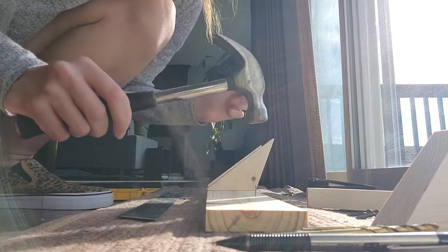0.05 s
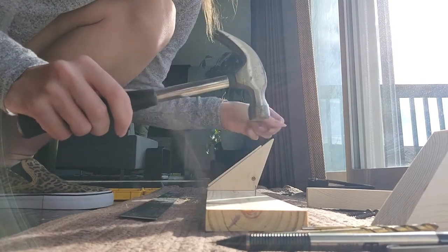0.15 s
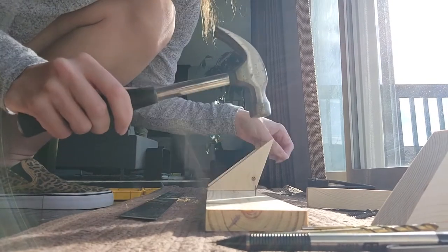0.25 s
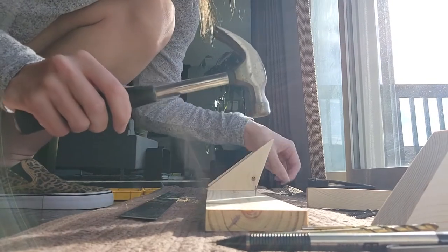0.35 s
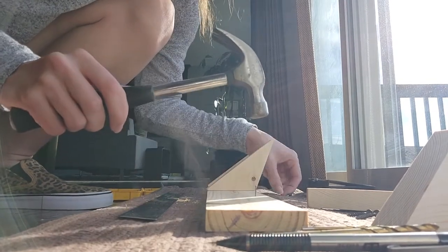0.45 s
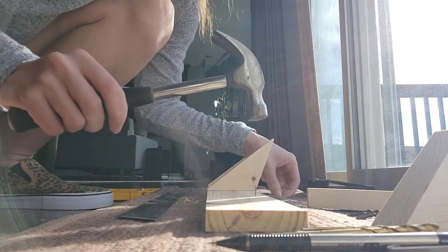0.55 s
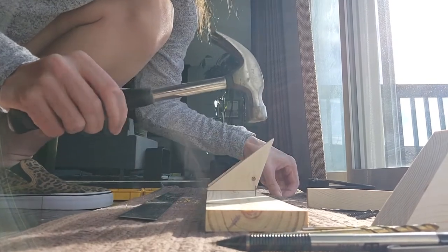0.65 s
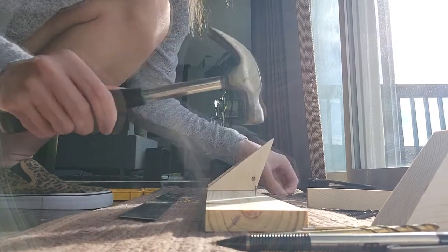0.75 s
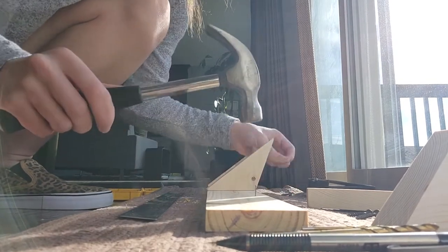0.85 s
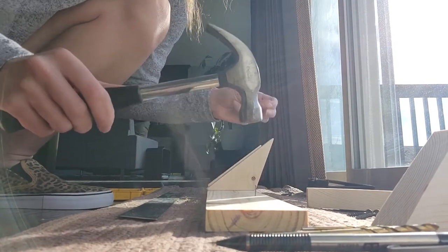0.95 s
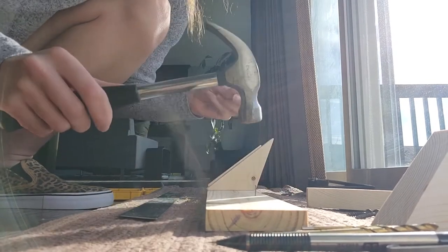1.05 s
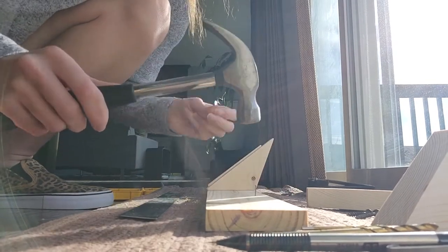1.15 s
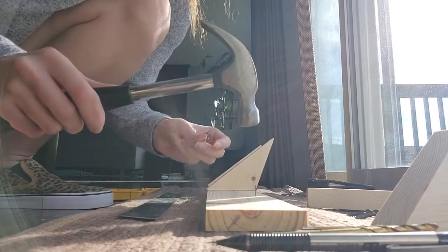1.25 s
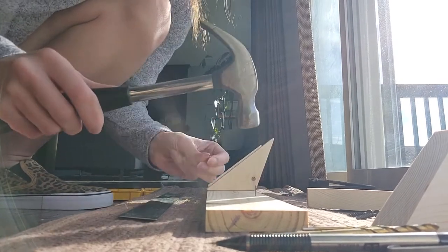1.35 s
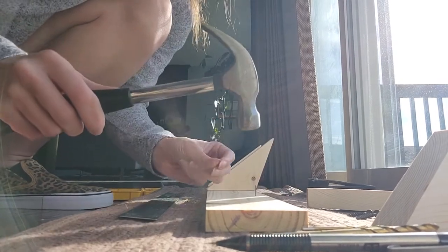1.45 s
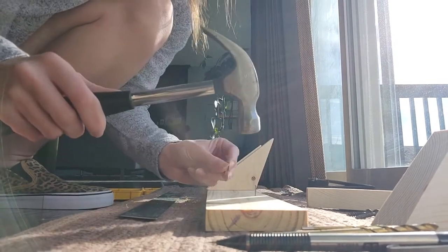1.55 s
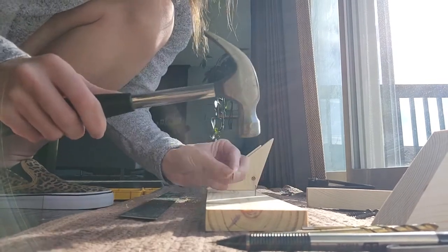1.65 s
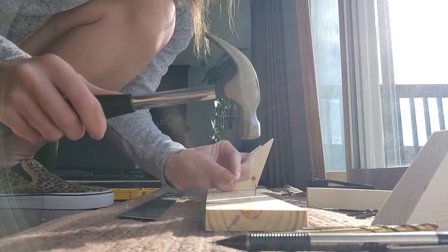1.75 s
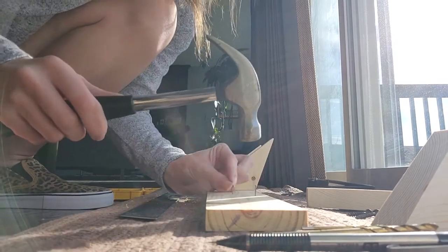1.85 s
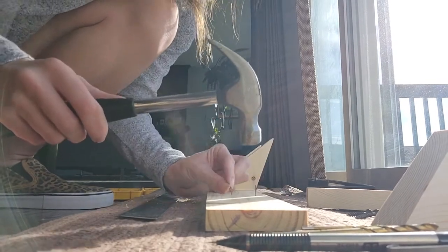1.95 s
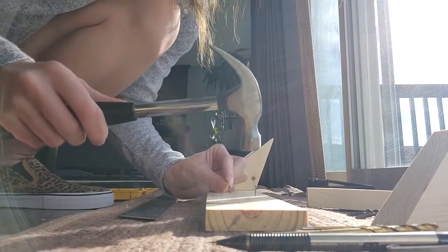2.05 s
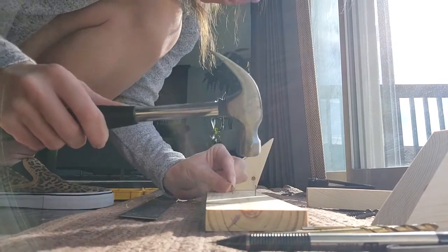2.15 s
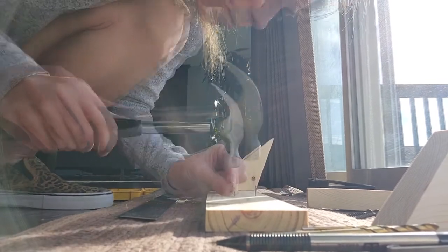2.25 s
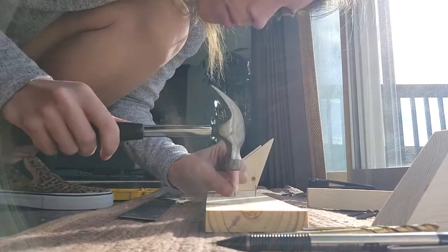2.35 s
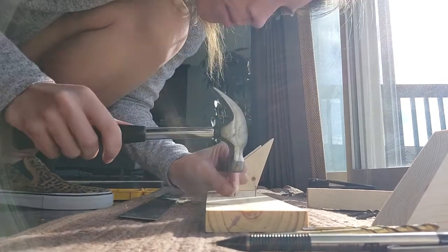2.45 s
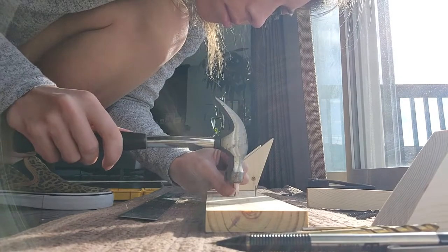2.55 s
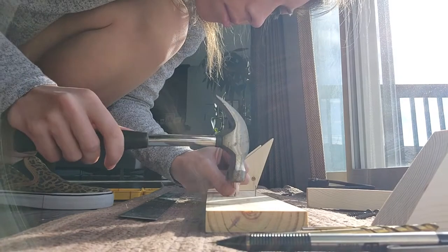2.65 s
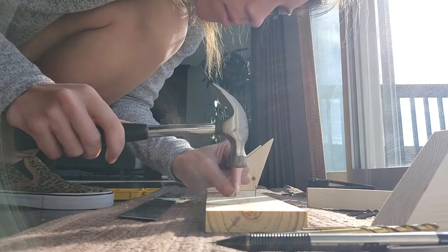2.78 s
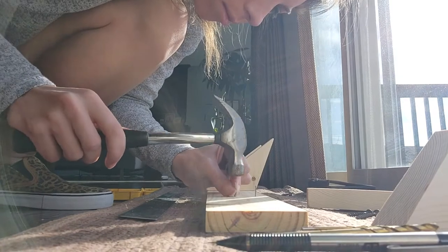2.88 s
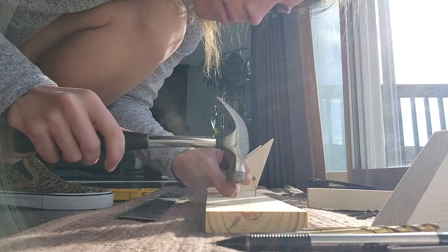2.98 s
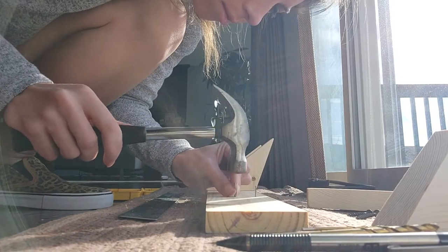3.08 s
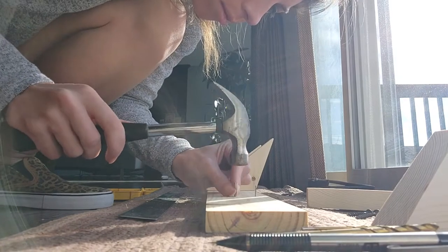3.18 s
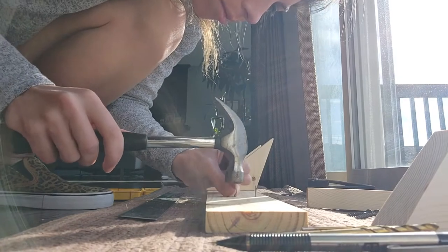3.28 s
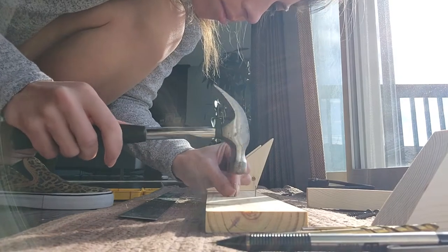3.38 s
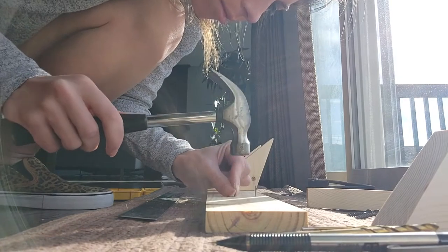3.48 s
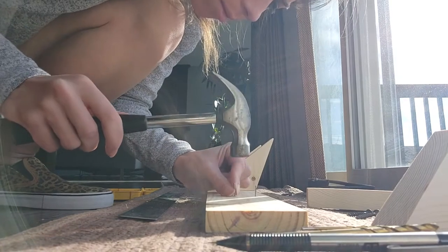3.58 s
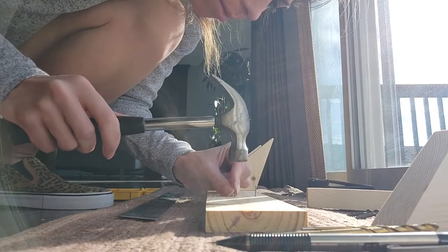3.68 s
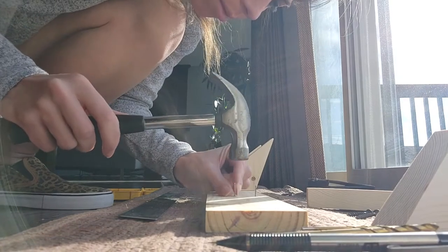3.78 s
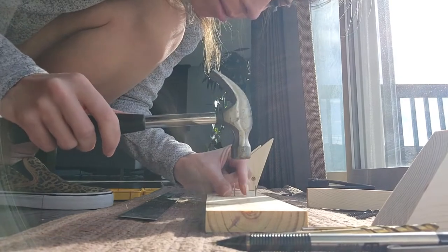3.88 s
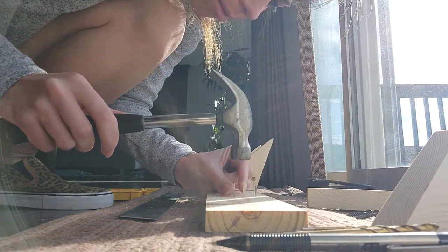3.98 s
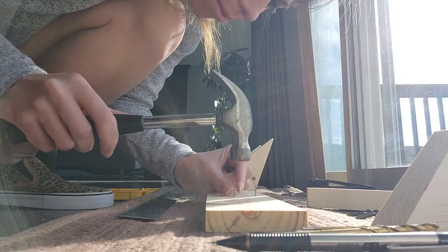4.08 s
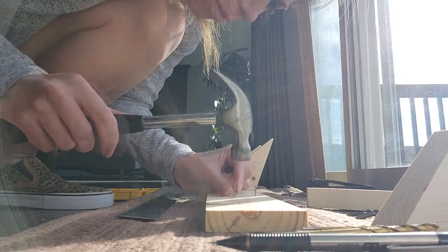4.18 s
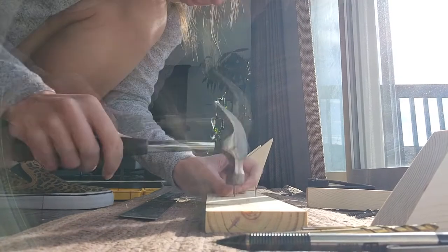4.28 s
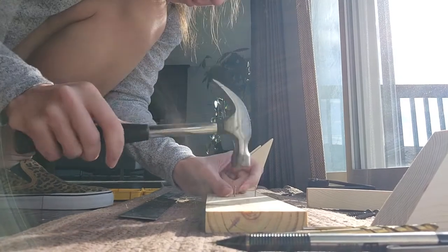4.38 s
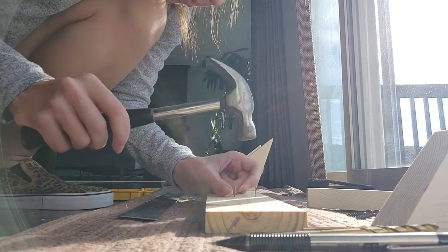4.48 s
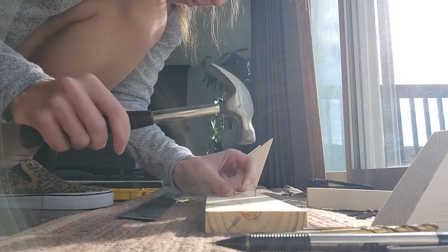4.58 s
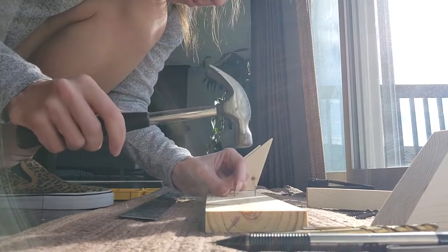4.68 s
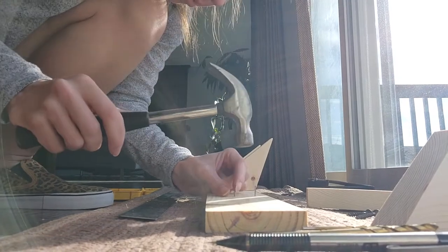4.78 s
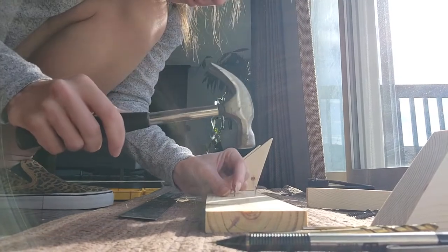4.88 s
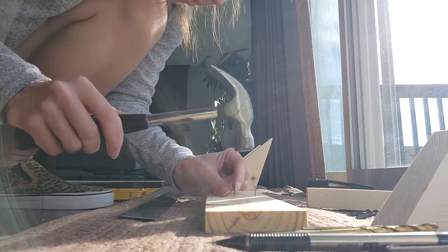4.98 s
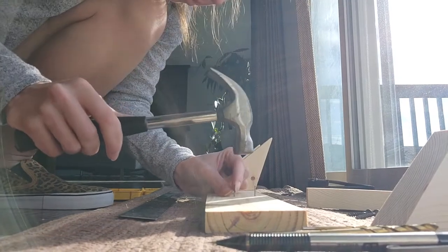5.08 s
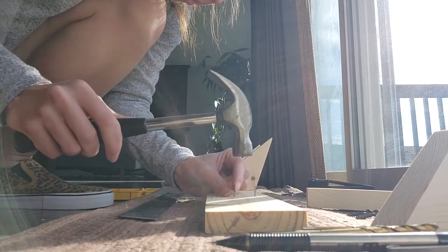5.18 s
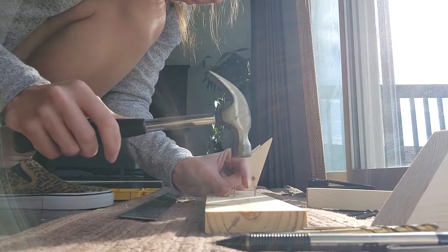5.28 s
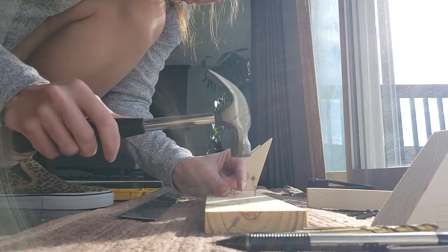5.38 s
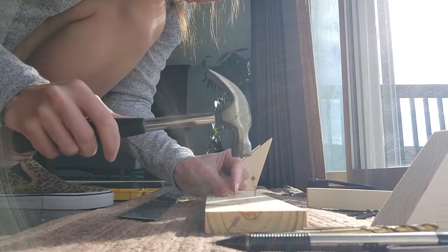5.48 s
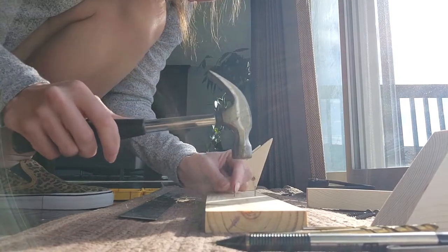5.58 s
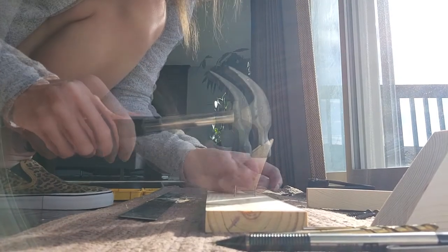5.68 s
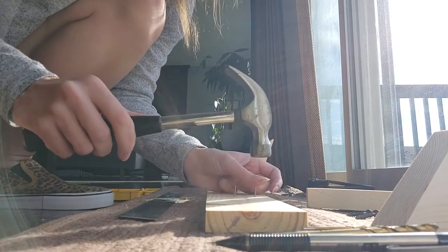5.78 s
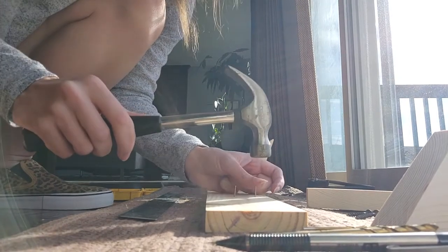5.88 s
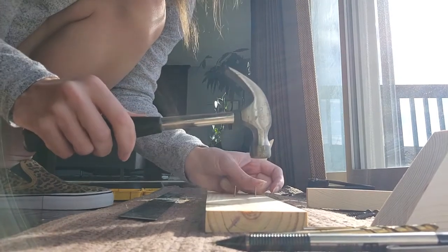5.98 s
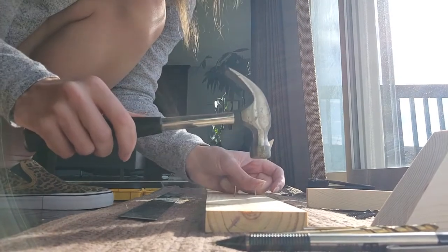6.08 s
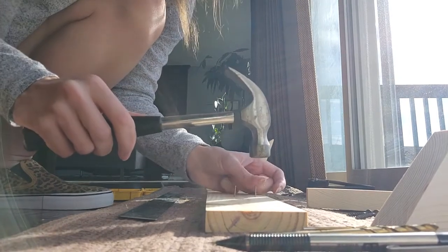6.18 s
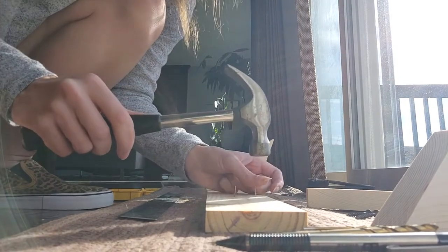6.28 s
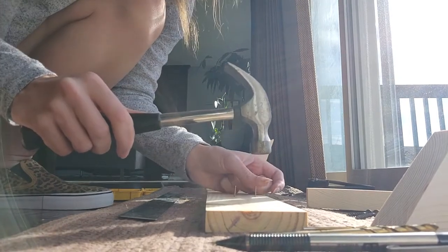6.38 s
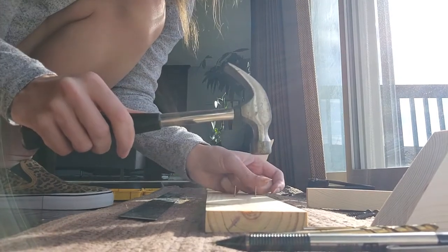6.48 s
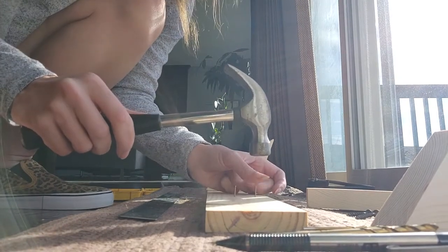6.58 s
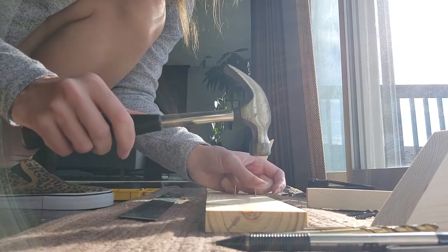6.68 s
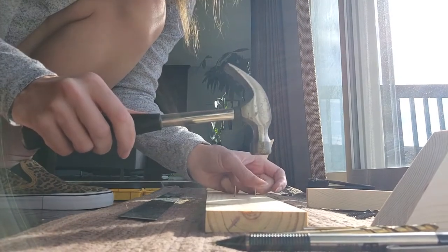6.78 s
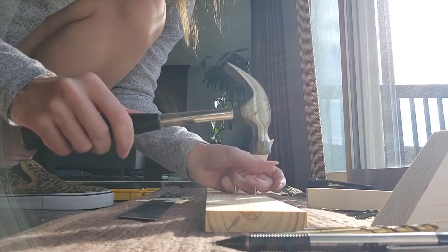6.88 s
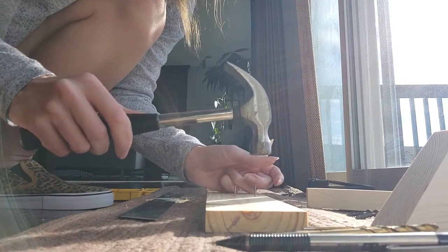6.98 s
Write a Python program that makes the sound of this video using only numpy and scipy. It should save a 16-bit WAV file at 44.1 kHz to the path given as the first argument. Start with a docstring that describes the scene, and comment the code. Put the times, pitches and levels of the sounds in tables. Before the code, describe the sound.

A low pulsing motor hum and dripping water indoors, with three dull hammer knocks and then a harder, brighter one on wood.

```python
"""Hammer taps beside a water pump

A claw hammer taps a brad into a pine block on a carpeted floor, a hand's length from a two-port microphone.
The block knocks, the floor thuds, the steel head rings and the block hops: each is a set of fading tones.
Across the room a pump hums against a second motor (steady tones), and its outflow drips (ringing bubbles).
Air rush and short bursts of high hiss are shaped noise. Five stretches are spliced, the middle ones quieter."""
import sys
import numpy as np
from scipy import signal
from scipy.fft import rfft, irfft
from scipy.io import wavfile

SR = 44100
rng = np.random.default_rng(int(sys.argv[2]) if len(sys.argv) > 2 else 0)


def pcm_store(signal):
    """Save signal as 16-bit PCM."""
    levels = np.round(np.clip(np.atleast_2d(signal), -1, 1) * 32767)
    wavfile.write(sys.argv[1], SR, levels.astype(np.int16).T)


N = 310464
T = np.arange(N) / SR
LEFT_RIGHT = np.array([[1], [-1]])  # shares a level difference between the two ports


def undb(db):
    """Turn decibels into a plain loudness factor."""
    return 10 ** (np.asarray(db) / 20)


def read(table, hz, column=1):
    """Read a table column at these frequencies, in straight lines on a log frequency axis."""
    table = np.array(table, float)
    return np.interp(np.log(np.maximum(hz, 1)), np.log(table[:, 0]), table[:, column])


def add(out, at_s, sound):
    """Mix a short sound in at a time."""
    i = int(at_s * SR)
    out[i:i + len(sound)] += sound[:N - i]


# how alike the noise is at the two ports: f/Hz, likeness (0 to 1)
PORT_ALIKENESS = [(60, 1), (200, 0.83), (500, 0.65), (1300, 0.09), (5000, 0), (8000, 0.93), (15000, 0.47)]
# how far the left port is louder than the right in noise and echoes: f/Hz, level difference/dB
NOISE_BALANCE = [(60, 1.0), (110, 0.5), (200, 2.0), (380, 3.5), (700, 2.5), (1290, -0.5), (2380, 1.0),
                 (4400, 3.5), (8120, 3.5), (15000, 1.0)]


def diffuse(size):
    """Noise from all around, as spectra at the two ports: alike in the bass, unrelated in the middle."""
    hz = np.arange(size // 2 + 1) * SR / size
    alike = np.clip(read(PORT_ALIKENESS, hz), 0, 1)
    mid, side = rfft(rng.standard_normal((2, size)))
    pair = np.sqrt((1 + alike) / 2) * mid + LEFT_RIGHT * np.sqrt((1 - alike) / 2) * side
    return hz, pair * undb(LEFT_RIGHT * read(NOISE_BALANCE, hz) / 2)


PUMP_HZ = 60.105


def casing_buzz(turns):
    """The pump casing buzzes once a turn: noise around 1280 Hz jumps up, then sinks until the next turn."""
    hz, pair = diffuse(N)
    casing = irfft(pair / (1 + ((hz - 1280) / 90) ** 2), N)
    return undb(-62) * np.exp(-(turns % 1) / 1.05) * casing / np.std(casing)


# the spliced stretches: start t/s, level/dB, drone crest t/s, throb peak t/s, throb f/Hz
SPLICED_STRETCHES = [(0, 0, .5421, .296, 6.69), (.7139, 0, .9578, 1.019, 6.69),
                     (2.245, -9, 2.4533, 2.441, 6.68), (4.2422, -10.5, 5.4293, 5.18, 6.64),
                     (5.6736, 0, 5.8938, 5.981, 6.6)]
STRETCH_NUMBER = np.searchsorted(np.array(SPLICED_STRETCHES)[:, 0], T, side="right") - 1  # at every sample
# hum at multiples of the mains pitch: multiple, level/dB (rms, before port balance and stretch level)
MAINS_LINES = [(2, -57), (3, -68), (4, -66), (6, -69.5), (7, -65.5), (8, -70.5), (12, -72)]
MAINS_HZ = 60.015
PUMP_DB, MOTOR_DB = -47.5, -52.5  # rms, before port balance and stretch level


def hum(crest_s, throb_s, beat_hz):
    """The pump drones just above mains pitch and throbs as it beats with a second motor, over mains hum."""
    since_crest = T - crest_s
    turns = PUMP_HZ * since_crest
    lines = sum(undb(db) * np.cos(2 * np.pi * k * MAINS_HZ * since_crest + k) for k, db in MAINS_LINES)
    pump = undb(PUMP_DB) * np.cos(2 * np.pi * turns)
    motor = undb(MOTOR_DB) * np.cos(2 * np.pi * (turns + beat_hz * (T - throb_s)))
    tones = np.sqrt(2) * (lines + pump + motor)  # rms level to peak level
    return tones * undb(0.4 * LEFT_RIGHT) + casing_buzz(turns)


# room air and water rush: f/Hz, level/dB per Hz (before port balance and stretch level)
AIR_RUSH = [(30, -105), (90, -83.5), (165, -90.5), (300, -88), (410, -85.5), (620, -87), (940, -98),
            (1500, -100.5), (1830, -96), (2400, -108), (3500, -113), (6900, -117), (8700, -130),
            (12300, -124), (16000, -128)]


def air():
    """Steady rush of the room and the running water: noise coloured by the table."""
    hz, pair = diffuse(N)
    return irfft(pair * undb(read(AIR_RUSH, hz)) * np.sqrt(SR / 2), N)


# echoes in each pitch region: f/Hz, t60/s (time to fall 60 dB, before the hurry setting), level/dB
ROOM_ECHOES = [(71.5, 0.34, -4), (206, 0.4, -10.5), (499, 0.4, -10.5), (1340, 0.48, -16.5),
               (4000, 0.35, -3), (10060, 0.32, -11)]


def room(x, hurry=0.85, build_s=0.0012):
    """Echoes as octave bands of diffuse noise that build up, then die at their own rate.
    A larger hurry makes them die faster."""
    size = SR // 2
    t = np.arange(size) / SR
    hz, pair = diffuse(size)
    response = 0
    for centre in 1000 * 2. ** np.arange(-4, 5):
        octaves = np.log2(np.maximum(hz, 1) / centre)
        band_shape = np.cos(np.pi / 2 * np.clip(octaves, -1, 1)) ** 2
        band = irfft(pair * band_shape, size)
        decay = np.exp(-np.log(1000) * t * hurry / read(ROOM_ECHOES, centre))
        tail = decay * (1 - np.exp(-t / build_s))
        tail = tail / np.sqrt(np.sum(tail ** 2))
        response = response + undb(read(ROOM_ECHOES, centre, column=2)) * band * tail
    return signal.fftconvolve(x[None], response, axes=1)[:, :N]


# drips at set times, most of them loud:
# t/s, middle bubble f/Hz (before scatter and glide), level/dB (before the mix)
TIMED_DRIPS = [(0.045, 1970, -54.5), (0.05, 3410, -60), (0.04, 6940, -58.5), (0.31, 2070, -56),
               (0.44, 3780, -68), (0.562, 3080, -59.5), (0.656, 4640, -55.5), (0.668, 3020, -52),
               (0.735, 6040, -56), (0.793, 2850, -60), (0.865, 3080, -56.5), (0.893, 2520, -54.5),
               (0.9, 1150, -47.5), (1.235, 6680, -57), (1.266, 3560, -63.5), (1.35, 4600, -62.5),
               (1.37, 3110, -48.5), (1.508, 2770, -58.5), (1.574, 5500, -59.5), (1.758, 1680, -53),
               (1.835, 4130, -61.5), (1.893, 3080, -54), (1.899, 2265, -46), (2.0, 6000, -59),
               (2.098, 3360, -59), (2.148, 3070, -58.5), (2.205, 4590, -60.5), (2.362, 2460, -61),
               (2.476, 3100, -55), (2.521, 6800, -54.5), (2.533, 2180, -51), (2.579, 5250, -56),
               (3.235, 2920, -56), (3.254, 5000, -63), (3.53, 3140, -54), (3.62, 7250, -56),
               (3.656, 2660, -52.5), (3.668, 5000, -58.5), (3.884, 4280, -54.5), (3.93, 2540, -50.5),
               (4.119, 2490, -51.5), (4.775, 3570, -62), (4.817, 1520, -51), (5.046, 6300, -66),
               (5.255, 5750, -67), (5.445, 2850, -62), (5.575, 7150, -66), (5.826, 4995, -62),
               (5.848, 3850, -56), (5.888, 6900, -64), (5.92, 5500, -63.5), (6.097, 3090, -52),
               (6.161, 7200, -57), (6.168, 4660, -60.5), (6.28, 5100, -65), (6.35, 2497, -62.5),
               (6.387, 3330, -65), (6.502, 7260, -58), (6.624, 2980, -61), (6.73, 6000, -54.5),
               (6.955, 7000, -57)]
# gap between the bubbles of a -55 dB drop, as a share of the pitch before chance; louder drops spread wider
BUBBLE_SPREAD, SPREAD_PER_DB = .055, .003


def drips(cycles=12.8, glide=0.029, small_db=-75.0, count=200):
    """Each drop traps three bubbles of near sizes that ring a few cycles and rise in pitch; echoes dominate.
    A splice cuts off the echoes of the drops before it."""
    chance = rng.random((count, 3))
    small_s = chance[:, 0] * N / SR
    small_hz = 1800 * 4.3 ** chance[:, 1]
    small_level_db = small_db - 9 * chance[:, 1] + 12 * chance[:, 2] ** 2  # higher drips tend to be fainter
    out = np.zeros(N)
    t = np.arange(900) / SR
    for s, hz, db in np.r_[TIMED_DRIPS, np.c_[small_s, small_hz, small_level_db]]:
        spread = max(BUBBLE_SPREAD + SPREAD_PER_DB * (db + 55), .01) * rng.uniform(.6, 1.4)
        steps = np.array([[-1], [0], [1]]) + 0.24 * rng.standard_normal((3, 1))
        bubbles_hz = hz * (1 + spread * steps)
        age = t * bubbles_hz / cycles
        waves = np.sin(2 * np.pi * bubbles_hz * t * (1 + glide * age / 2))
        pings = waves * age * np.exp(-3 * age)
        add(out, s, undb(db) * np.sum(pings * undb([[-3], [0], [-3]]), axis=0))
    echoes = 0
    for k in np.unique(STRETCH_NUMBER):
        inside = STRETCH_NUMBER == k
        echoes = echoes + inside * room(out * inside, hurry=0.93, build_s=0.0043)
    return undb(10) * out + undb(26.5) * echoes


# hammer blows: t/s, floor thud level/dB, block knock level/dB, brad ring level/dB, steel level/dB,
# crack level/dB, top hiss level/dB, left minus right level/dB (levels before the mix)
HAMMER_BLOWS = [(2.6712, -10, -18, -31, -35, -46, -58, 1.5),
                (3.0319, -7.5, -8.5, -21.5, -32, -44.5, -52, 1.5), (3.366, -3, -8, -15, -26, -32, -57, 2),
                (4.3653, -1, 0.5, -16.5, -15, -19, -30.5, -1)]
RANDOM_HISS_DB, RANDOM_SCATTER_DB, SPLICE_TICK_DB = -86.5, 2.5, -78.5  # before stretch level
HISS_TAIL_DB, HISS_TAIL_S = -18, 0.043  # tail against the burst; time to fall to 37 %


def top_hiss(fade_s=0.0035, count=20):
    """Short bursts of the highest hiss with a faint tail, alike at both ports.
    There is one at each blow and splice, and others at random times."""
    chance = rng.random((count, 2))
    random_db = RANDOM_HISS_DB - RANDOM_SCATTER_DB * np.log(1 - chance[:, 1])
    at_random = np.c_[chance[:, 0] * N / SR, random_db]
    splices = [(row[0], SPLICE_TICK_DB) for row in SPLICED_STRETCHES[1:]]
    blows = np.array(HAMMER_BLOWS)[:, [0, 6]]
    age = np.arange(SR // 4) / SR
    burst = np.exp(-age / fade_s) + undb(HISS_TAIL_DB) * np.exp(-age / HISS_TAIL_S)
    loudness = np.zeros(N)
    for s, db in np.r_[at_random, splices, blows]:
        add(loudness, s, undb(db) * burst)
    top_only = signal.butter(3, 9500, "high", fs=SR, output="sos")
    return loudness * signal.sosfilt(top_only, rng.standard_normal(N))


# the block hops after a blow: t/s, floor thud level/dB, block knock level/dB (before the mix)
BLOCK_HOPS = [(2.702, -15.5, -24), (3.058, -32, -44), (3.09, -23, -31), (3.377, -18, -25),
              (3.3932, -12.5, -16), (3.404, -19, -20), (3.421, -25.5, -49), (4.378, -36, -8),
              (4.3985, -35, -3), (4.418, -16, -32), (4.437, -13, -35)]
# a hop shakes the metal less than its blow did, and less the later it comes
HOP_BRAD_DB, HOP_STEEL_DB, HOP_CRACK_DB, HOP_FADE_DB_PER_S = -13.5, -18, -14, 131


def knocks():
    """Blows and the hops they cause, as one list of rows (t/s, thud, knock, brad, steel, crack level/dB)."""
    blows, hops = np.array(HAMMER_BLOWS)[:, :6], np.array(BLOCK_HOPS)
    cause = blows[np.searchsorted(blows[:, 0], hops[:, 0]) - 1]  # the last blow before each hop
    fade_db = HOP_FADE_DB_PER_S * (hops[:, :1] - cause[:, :1])
    metal_db = cause[:, 3:] + [HOP_BRAD_DB, HOP_STEEL_DB, HOP_CRACK_DB] - fade_db
    return np.r_[blows, np.c_[hops, metal_db]]


def ring(modes, scatter_db, detune, rise_s):
    """A struck body rings in several fading tones; contact builds over a moment, and each hit differs a little."""
    t = np.arange(SR // 4) / SR
    hz, db, t60 = np.transpose(modes)[:, :, None]
    chance = rng.standard_normal((2, len(modes), 1))
    waves = np.sin(2 * np.pi * hz * (1 + detune * chance[1]) * t)
    waves = undb(db + scatter_db * chance[0]) * waves
    contact = np.sin(np.pi / 2 * np.clip(t / rise_s, 0, 1)) ** 2
    return contact * np.sum(waves * np.exp(-np.log(1000) * t / t60), axis=0) / np.sum(undb(db))


# tones of the pine block: f/Hz, level/dB (against each other), t60/s
BLOCK_TONES = [(403, -6.5, 0.2), (426, 1.5, 0.063), (597, -27, 0.032), (750, 14.5, 0.029),
               (842, -5.5, 0.023), (1204, -7.5, 0.00615)]


def block_knock():
    """The struck wood knocks in low, short tones; it starts with a push the opposite way."""
    return -ring(BLOCK_TONES, scatter_db=1.2, detune=.01, rise_s=0.00082)


# tones of the brad: f/Hz, level/dB (against each other), t60/s
BRAD_TONES = [(1696, -14.5, 0.033), (1977, 17, 0.036), (2170, -24, .02), (2640, -3, 0.091),
              (2770, -8, 0.018), (3160, -21, 0.006)]


def brad_ring():
    """The brad rings in middle tones that set in gently, also pushed the opposite way."""
    return -ring(BRAD_TONES, scatter_db=0.47, detune=0.0086, rise_s=0.0019)


# tones of the steel head: f/Hz, level/dB (against each other), t60/s
STEEL_TONES = [(4780, -7, 0.0162), (5470, -8, 0.01), (5710, 17, 0.01), (6780, 4, 0.036),
               (8100, -12, 0.0084), (10700, -10, 0.0088)]


def steel_ring():
    """The steel head rings in high tones whose strengths vary a lot from hit to hit."""
    return ring(STEEL_TONES, scatter_db=5.9, detune=0.0069, rise_s=0.0011)


# colour of the scrape: f/Hz, level/dB (relative)
CRACK_COLOUR = [(300, -2), (1000, 7), (2500, 9), (4000, -1), (7500, -3.5), (9200, -21.5), (11000, -18),
                (15000, -17)]


def crack(rise_s=0.003):
    """The rough scrape of steel on steel: a burst of coloured noise a few milliseconds long."""
    age = np.arange(1024) / SR / rise_s
    hz = np.arange(513) * SR / 1024
    noise = irfft(rfft(rng.standard_normal(1024)) * undb(read(CRACK_COLOUR, hz)))
    return noise * age * np.exp(1 - age)


# tones of the floor: f/Hz, level/dB (against each other), t60/s
FLOOR_TONES = [(85, -10, 0.15), (118.8, 2.5, 0.055), (158.3, 0.5, 0.037), (202.6, 2.5, 0.064),
               (263, -27, 0.092)]


def floor_thud():
    """The floor thuds in deep tones; the carpet softens the push."""
    return ring(FLOOR_TONES, scatter_db=0.96, detune=0.046, rise_s=0.001)


# how far the left port is louder than the right in the airborne knock: f/Hz, level difference/dB
AIR_KNOCK_BALANCE = [(200, -7), (700, 2.5), (1290, -7), (2380, 4), (4400, 8.5), (8120, 9.5), (15000, 1)]
THUD_LATE_S, PORT_LAG_S = 0.0019, 0.000437
THUD_DB, KNOCK_DB = 1.5, 1.5  # direct sound against its echoes
BASS_CUT_HZ = 62


def taps():
    """The knock flies through the air to the right port first; the thud comes later through the floor to both."""
    through_air, through_floor, pan_db = np.zeros(N), np.zeros(N), np.zeros(N)
    for s, thud_db, knock_db, brad_db, steel_db, crack_db in knocks():
        add(through_floor, s + THUD_LATE_S, undb(thud_db) * floor_thud())
        add(through_air, s, undb(knock_db) * block_knock())
        add(through_air, s, undb(brad_db) * brad_ring())
        add(through_air, s, undb(steel_db) * steel_ring())
        add(through_air, s, undb(crack_db) * crack())
    for s, *_, side_db in HAMMER_BLOWS:
        pan_db[int(s * SR):] = side_db  # holds until the next blow
    hz = np.arange(N // 2 + 1) * SR / N
    lag = np.exp(-2j * np.pi * hz * PORT_LAG_S * np.array([[1], [0]]))  # delays the left port
    balance = undb(LEFT_RIGHT * read(AIR_KNOCK_BALANCE, hz) / 2)
    ports = irfft(rfft(through_air) * lag * balance, N)
    direct = undb(KNOCK_DB) * ports + undb(THUD_DB) * through_floor
    direct = direct * undb(LEFT_RIGHT * pan_db / 2)
    blows = direct + room(through_air + through_floor)
    # the small block moves no deep bass
    return signal.sosfilt(signal.butter(2, BASS_CUT_HZ, "high", fs=SR, output="sos"), blows)


def scene():
    """All sources together; each stretch has its own hum timing, so the hum jumps at a splice."""
    hum_timing = np.transpose(SPLICED_STRETCHES)[2:]
    pump_hum = hum(*(column[STRETCH_NUMBER] for column in hum_timing))
    return taps() + drips() + top_hiss() + air() + pump_hum


TOP_HZ = 15900


def record(dry):
    """The level steps at the splices, and a steep filter cuts the top."""
    gain_db = np.transpose(SPLICED_STRETCHES)[1]
    spliced = dry * undb(gain_db[STRETCH_NUMBER])
    return signal.sosfilt(signal.ellip(8, .2, 70, TOP_HZ, fs=SR, output="sos"), spliced)


dry = scene()
out = record(dry)
pcm_store(out)
```